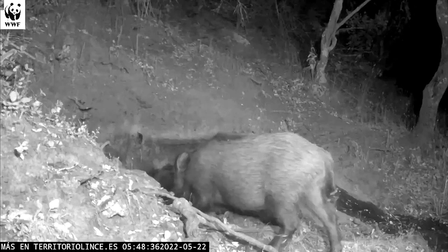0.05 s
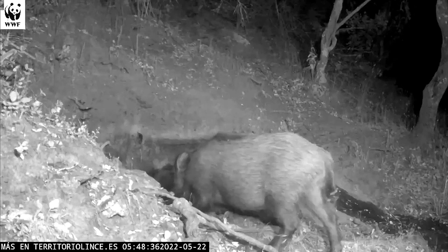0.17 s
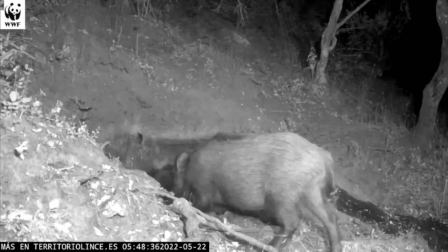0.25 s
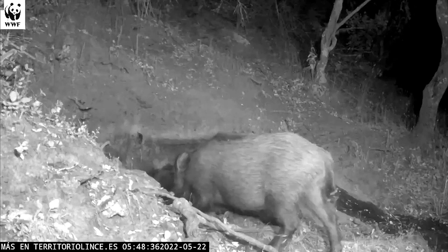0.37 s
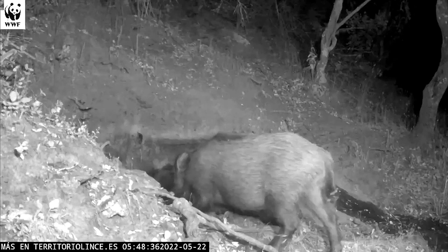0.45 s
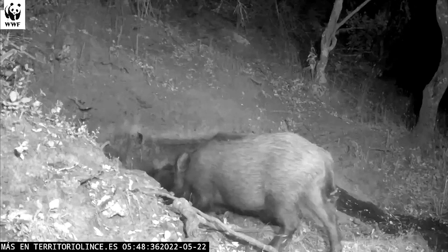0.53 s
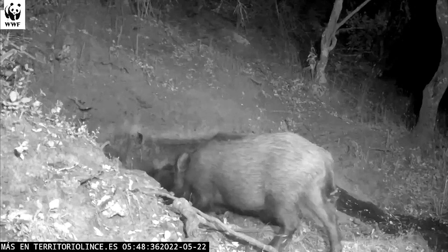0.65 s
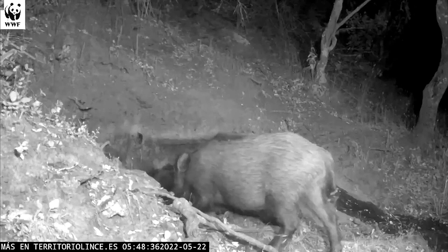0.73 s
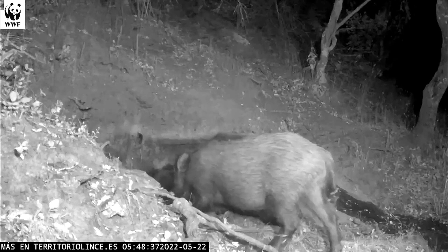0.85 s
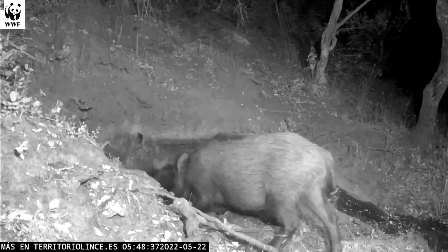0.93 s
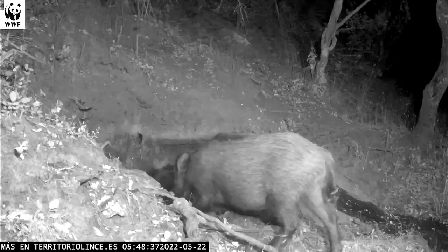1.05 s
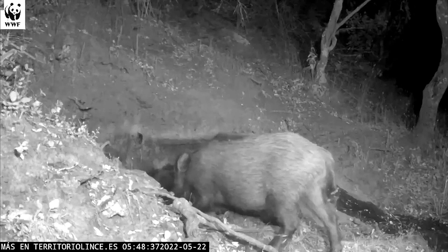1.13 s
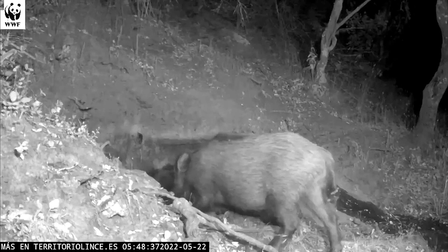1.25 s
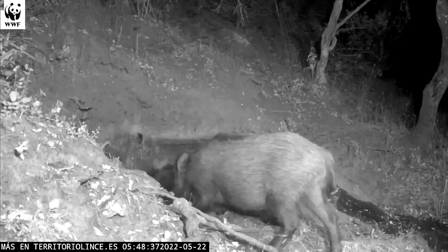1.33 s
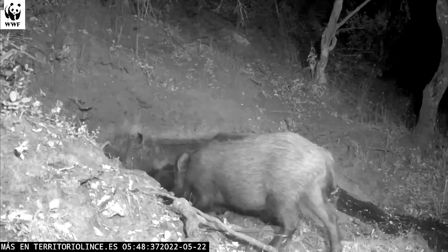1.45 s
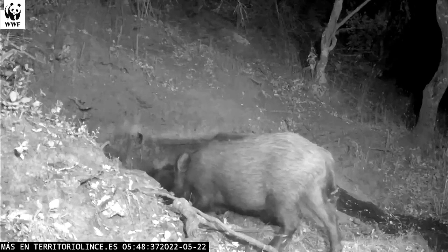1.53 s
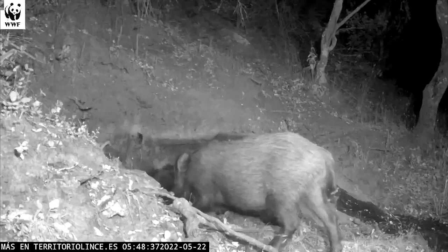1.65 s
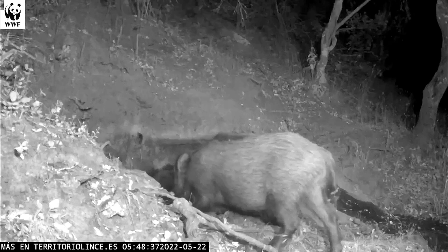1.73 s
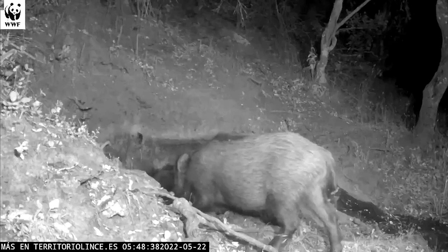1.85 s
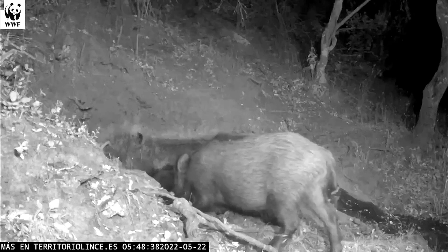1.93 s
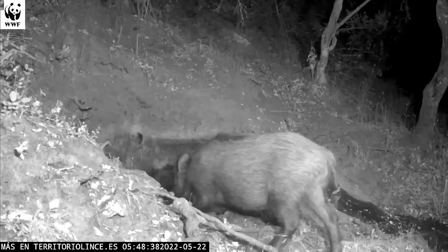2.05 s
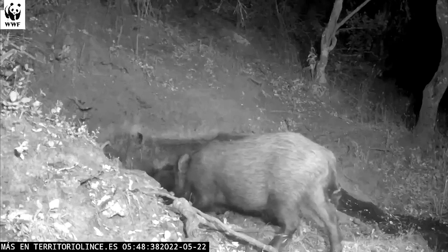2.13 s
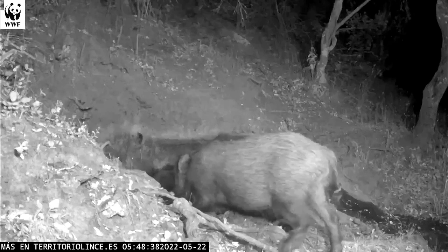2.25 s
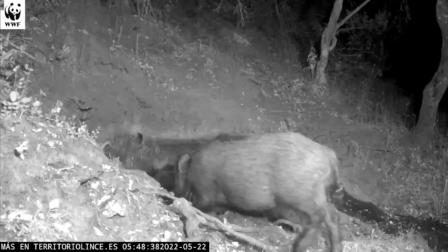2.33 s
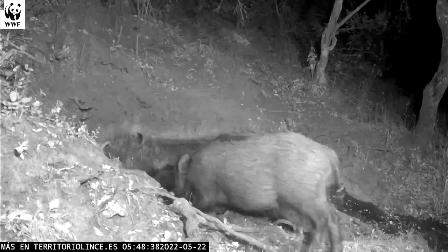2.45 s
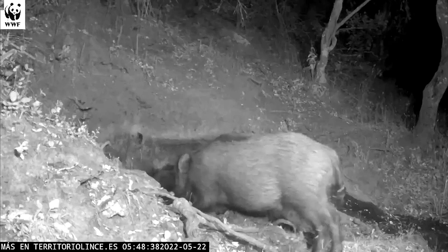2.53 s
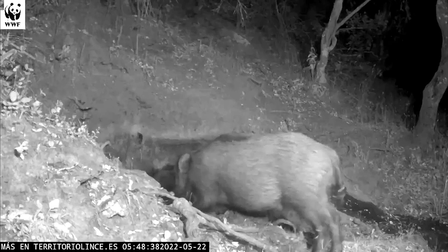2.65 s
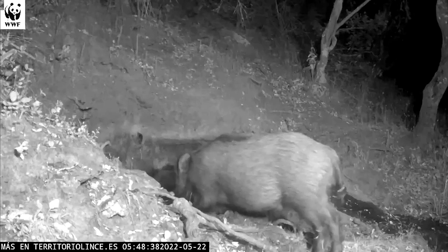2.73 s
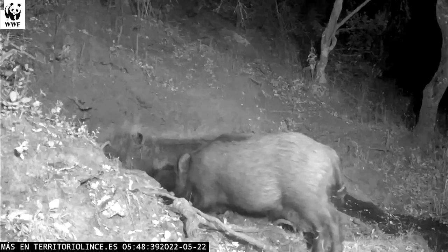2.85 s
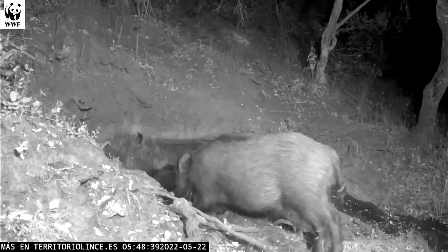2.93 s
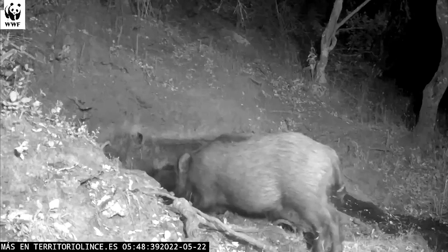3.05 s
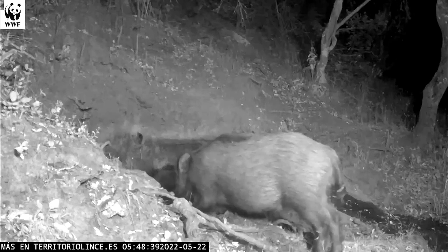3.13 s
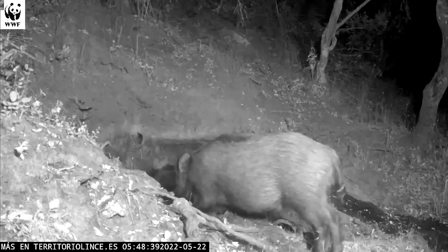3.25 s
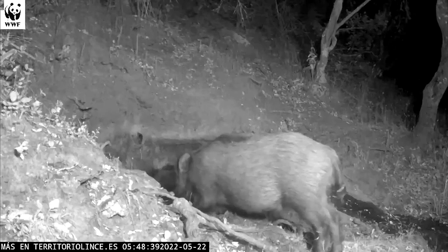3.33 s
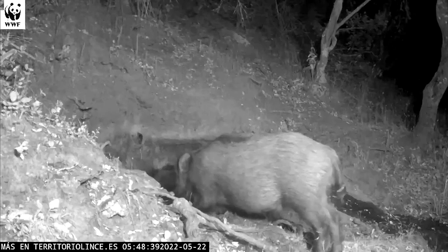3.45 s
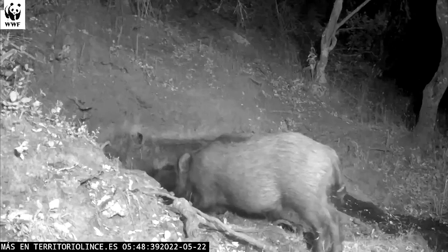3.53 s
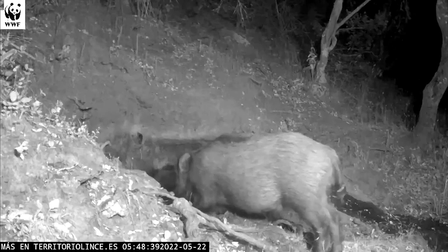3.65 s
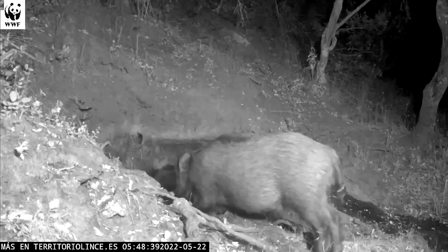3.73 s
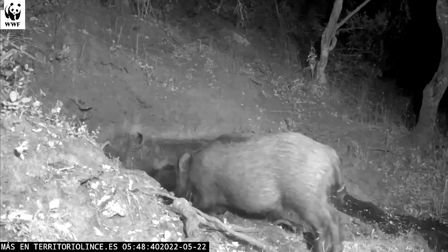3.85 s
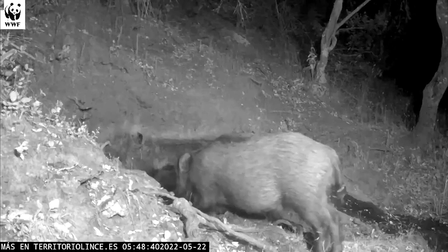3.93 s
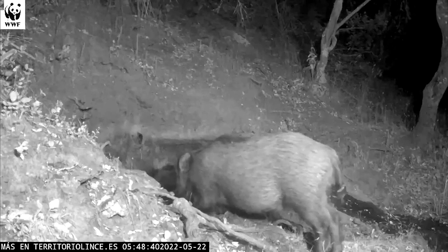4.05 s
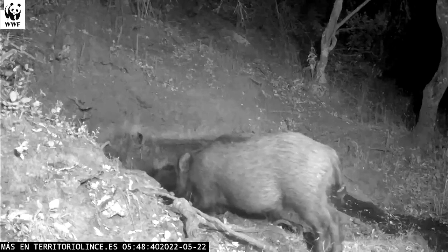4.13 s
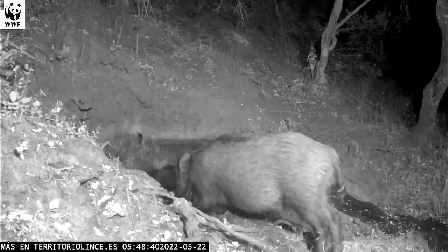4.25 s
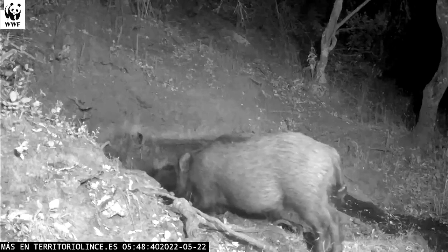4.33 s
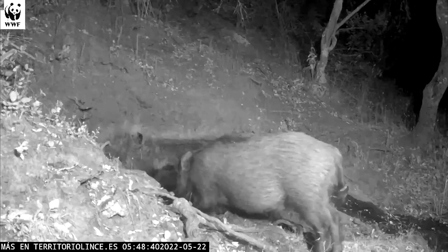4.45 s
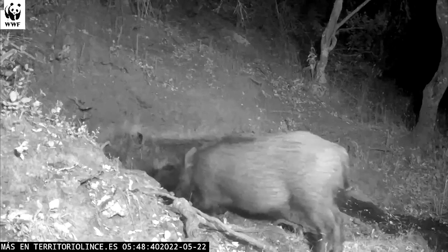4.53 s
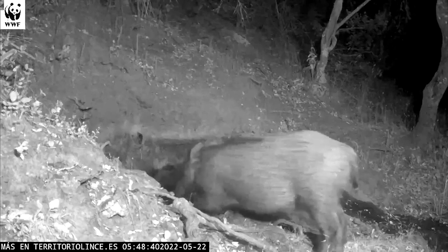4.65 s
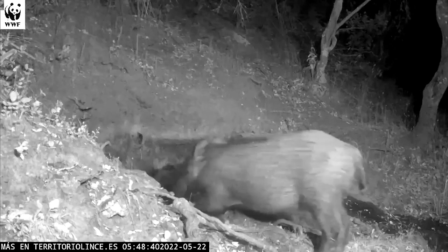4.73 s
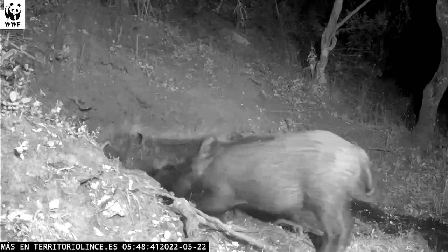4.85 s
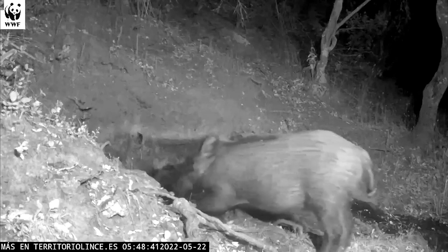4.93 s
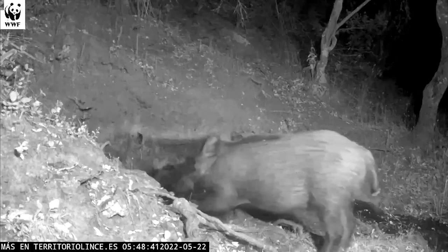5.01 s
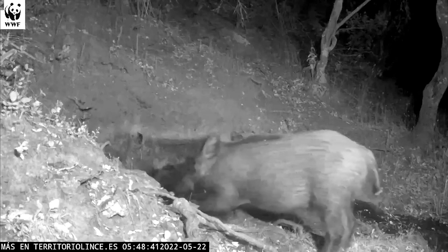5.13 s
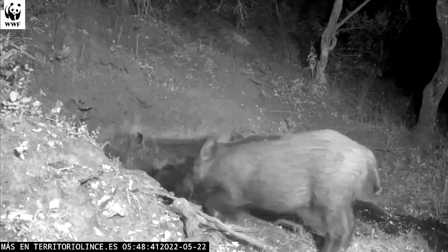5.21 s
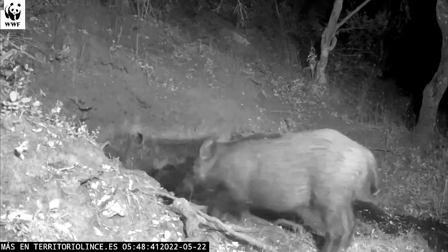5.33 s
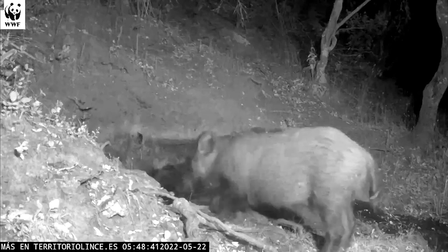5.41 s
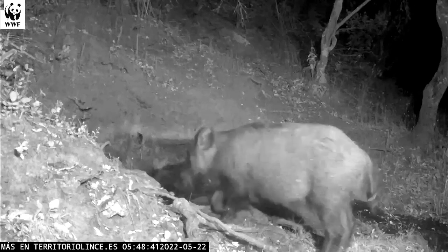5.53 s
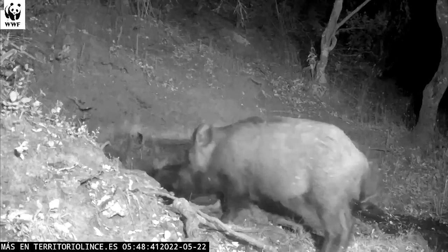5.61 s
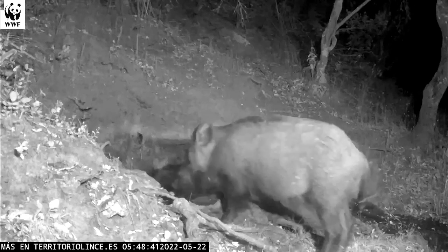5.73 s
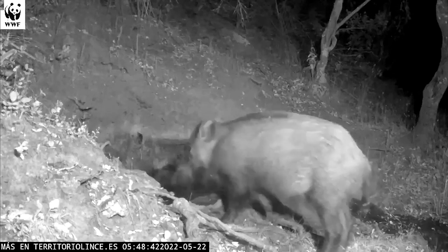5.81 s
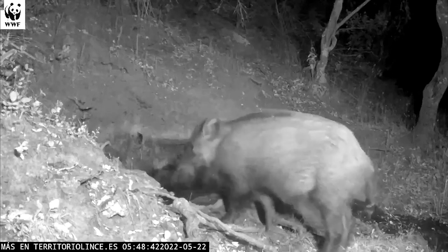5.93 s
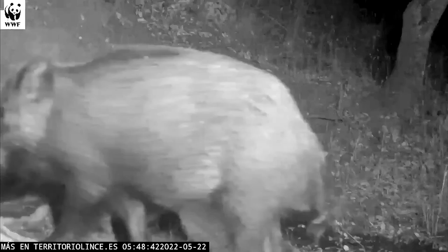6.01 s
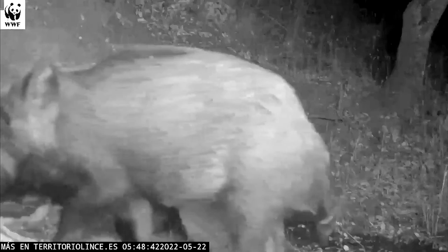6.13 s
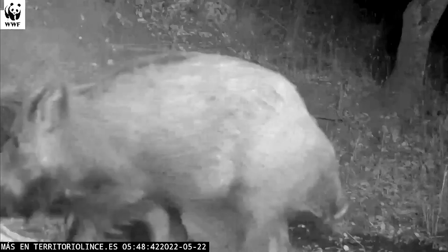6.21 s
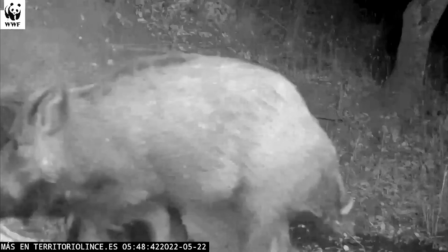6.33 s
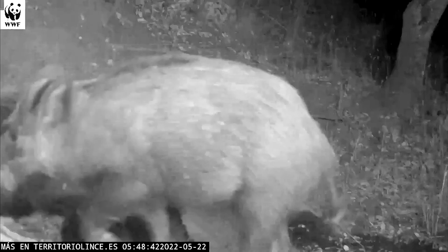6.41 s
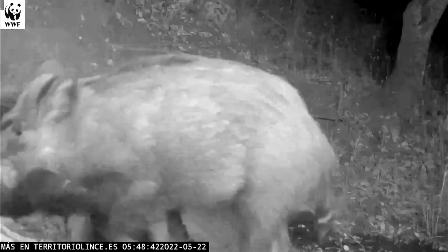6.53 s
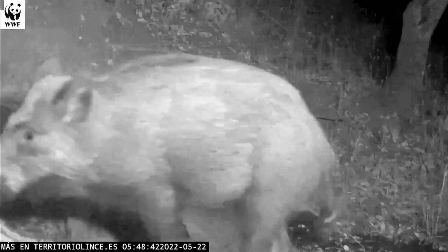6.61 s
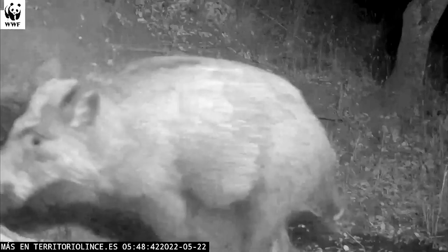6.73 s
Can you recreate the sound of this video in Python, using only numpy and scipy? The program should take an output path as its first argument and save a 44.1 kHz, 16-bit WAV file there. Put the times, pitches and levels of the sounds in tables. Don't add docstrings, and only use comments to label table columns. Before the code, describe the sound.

A boar at a muddy pool edge, heard through a cheap encased microphone with constant hiss, weak bass and rough, dulled treble. A brief snap and knock opens, followed by faint irregular lapping and occasional brittle ticks. A near-still stretch gives way to scattered footfalls, rustling leaves and snapping twigs, strongest near the end, with a very short faint echo from the bank.

```python
import sys
import numpy as np
from scipy import signal
from scipy.fft import rfft, irfft, next_fast_len
from scipy.io import wavfile
from scipy.ndimage import uniform_filter1d

SR = 44100
rng = np.random.default_rng(int(sys.argv[2]) if len(sys.argv) > 2 else 0)


def field_ratio(decibels):
    return 10 ** (np.asarray(decibels, dtype=float) / 20)


def output_pcm(signal):
    pcm = np.clip(np.atleast_2d(signal).T, -1, 1) * 32767
    wavfile.write(sys.argv[1], SR, np.round(pcm).astype(np.int16))


N = 298557


def rms_one(x):
    return x / np.sqrt(np.mean(x ** 2) + 1e-20)


def levels(rows):
    time_s, *columns = np.transpose(rows)
    span = np.arange(round(time_s[0] * SR), round(time_s[-1] * SR))
    return [span] + [np.interp(span / SR, time_s, column) for column in columns]


def coloured(x, spectrum):
    hz, db = np.transpose(spectrum)
    size = next_fast_len(N)
    log_hz = np.log(np.arange(size // 2 + 1) * SR / size + 1)
    gain = field_ratio(np.interp(log_hz, np.log(hz), db))
    return rms_one(irfft(rfft(x, size) * gain, size)[:N])


def drift(rate_hz):
    r = np.exp(-80 * np.pi * rate_hz / SR)
    slow = signal.lfilter([1], [1, -2 * r, r * r], rng.standard_normal(N // 40 + 2002))[2000:]
    return np.interp(np.arange(N) / 40, np.arange(len(slow)), rms_one(slow))


def resonance(x, hz, width_hz):
    r = np.exp(-np.pi * width_hz / SR)
    return signal.lfilter([1, 0, -1], [1, -2 * r * np.cos(2 * np.pi * hz / SR), r * r], x)


def grains(per_s, spread_db):
    sizes = field_ratio(spread_db * np.minimum(rng.exponential(1, N), 4))
    sizes = sizes * rng.choice([-1, 1], N)
    return sizes * (rng.random(N) < per_s / SR) + 1e-18


def add(out, start_s, sound, peak_db):
    i = max(round(start_s * SR), 0)
    out[i:i + len(sound)] += (field_ratio(peak_db) * sound / np.abs(sound).max())[:N - i]


def bursts(events, rise_s):
    out, t = np.zeros(N), np.arange(3000) / SR
    for start_s, peak_db, hz, t60_s, width_share, crack_share in events:
        noise = rng.standard_normal(len(t))
        burst = noise * (1 - np.exp(-t / rise_s)) * field_ratio(-60 * t / t60_s)
        ring = resonance(burst, hz, width_share * hz)
        ring = rms_one(resonance(ring, hz, 2 * width_share * hz))
        crack = rms_one(resonance(burst * field_ratio(-40 * t / t60_s), hz, 1.6 * hz))
        add(out, start_s - rise_s, ring + crack_share * crack, peak_db + 0.5)
    return out


# time_s, mouth_ring_db, wet_sizzle_db
LAPS = [
    [(0.75, -63, -59), (0.862, -58.5, -57), (0.926, -59, -53), (0.974, -50, -40.5), (0.982, -53, -59),
     (0.998, -64.5, -51.5), (1.06, -45, -45.5), (1.158, -67, -52), (1.278, -55, -60.5), (1.3, -78, -50)],
    [(1.4, -55, -49), (1.46, -48, -52.5), (1.488, -73, -53), (1.53, -45, -43.5), (1.568, -75, -53),
     (1.62, -59, -52)],
    [(1.8, -54, -48), (1.822, -59, -63), (1.854, -47, -41), (2.066, -56, -56), (2.098, -61, -60),
     (2.176, -54, -43), (2.184, -50, -68), (2.222, -66, -47), (2.3, -54, -52)],
    [(2.5, -63, -46), (2.554, -54, -64), (2.574, -48.5, -43.5), (2.604, -67, -64), (2.65, -59, -63)],
    [(2.9, -60, -53), (3.004, -48.5, -49), (3.122, -58, -51), (3.14, -68, -72), (3.162, -73, -45),
     (3.192, -70, -64), (3.2, -55, -50)],
    [(3.4, -69, -62), (3.422, -68, -51), (3.43, -70, -63), (3.46, -52.5, -53), (3.548, -56, -41.5),
     (3.562, -68, -67), (3.65, -58, -48)],
]


def lapping():
    mouth_hz, spray_hz = np.geomspace(994, 1300, 4), np.geomspace(4450, 5910, 4)
    mouth = rms_one(sum(resonance(grains(250, 2.8), hz, 110) for hz in mouth_hz))
    spray = rms_one(sum(resonance(grains(600, 3.0), hz, 500) for hz in spray_hz))
    out = np.zeros(N)
    for lap in LAPS:
        span, ring_db, sizzle_db = levels(lap)
        out[span] = field_ratio(ring_db + 2.4) * mouth[span] + field_ratio(sizzle_db + 0.5) * spray[span]
    return out


# start_s, peak_db, pitch_hz, t60_s (fade by 60 dB),
# width_share (of pitch), crack_share (loudness of wide crack beside the ring)
TWIGS = [(0.0306, -22.5, 5600, 0.02, 0.2, 0.41), (0.0358, -25, 6000, 0.013, 0.42, 0.26),
         (0.0428, -13.5, 5770, 0.0073, 0.15, 0.18), (0.0482, -21.5, 5520, 0.021, 0.21, 0.24),
         (0.9692, -32, 4870, 0.016, 0.17, 0.3), (1.038, -24, 4640, 0.014, 0.17, 0.16),
         (1.4513, -26, 4660, 0.014, 0.3, 0.23), (1.4693, -26, 4740, 0.016, 0.33, 0.24),
         (1.512, -27.5, 4700, 0.021, 0.21, 0.22), (2.0043, -26, 4700, 0.016, 0.27, 0.3),
         (2.0576, -26, 4670, 0.021, 0.16, 0.26), (3.029, -26.5, 4660, 0.0156, 0.17, 0.22),
         (3.1576, -28.5, 4420, 0.02, 0.24, 0.3), (3.2807, -33, 4460, 0.018, 0.12, 0.3),
         (4.6636, -12.5, 9700, 0.023, 0.36, 0.3), (5.2135, -11.5, 5500, 0.016, 0.5, 0.34),
         (5.404, -22, 4800, 0.025, 0.3, 0.33), (5.8927, -19.5, 5240, 0.0069, 0.3, 0.1),
         (5.904, -17, 6900, 0.012, 0.19, 0.75), (5.9585, -14.5, 5170, 0.014, 0.44, 0.9),
         (5.9936, -18.5, 5900, 0.013, 0.23, 0.3), (6.0404, -19, 5830, 0.015, 0.3, 0.3),
         (6.0479, -16.5, 5350, 0.0082, 0.37, 0.43), (6.054, -8, 4960, 0.03, 0.3, 0.12),
         (6.0744, -9.5, 4530, 0.01, 0.44, 0.38), (6.5808, -19, 5300, 0.0097, 0.55, 0.11),
         (6.5877, -20, 5790, 0.042, 0.24, 0.35), (6.6922, -26, 4400, 0.019, 0.3, 0.3),
         (6.7481, -18.5, 7800, 0.0074, 0.88, 0.16)]


def twig_snaps():
    return bursts(TWIGS, rise_s=0.0008)


# start_s, peak_db, pitch_hz, t60_s, width_share (of pitch), crack_share
DRY_TICKS = [(1.1214, -33, 6050, 0.012, 0.3, 0.81), (2.4024, -14, 5900, 0.0105, 0.71, 2.1),
             (2.4886, -18.5, 5900, 0.011, 0.31, 1.5), (4.6379, -24, 5700, 0.0091, 0.72, 1.3),
             (4.8524, -17, 5100, 0.0094, 0.67, 1.6), (5.2134, -13.5, 5320, 0.012, 0.8, 1.8),
             (5.2283, -16, 5300, 0.0097, 0.51, 1.9), (5.403, -20, 5040, 0.0093, 0.67, 1.7),
             (5.69, -22, 5250, 0.011, 0.57, 1.8), (5.866, -23.5, 5930, 0.014, 1, 1.2),
             (5.902, -16, 7300, 0.016, 0.97, 1.5), (6.402, -28, 5910, 0.012, 0.62, 1.4),
             (6.4159, -17, 5460, 0.016, 0.41, 1.5), (6.4241, -24.5, 5370, 0.0085, 0.8, 1.5),
             (6.449, -22, 7200, 0.012, 0.47, 1.2)]


def dry_ticks():
    return bursts(DRY_TICKS, rise_s=0.00019)


# start_s, peak_db, pitch_hz, t60_s, width_share (of pitch), crack_share
HOOF_KNOCKS = [(0.0403, -14, 1970, 0.022, 0.41, 0.52), (0.2304, -27.5, 2960, 0.016, 0.32, 0.78),
               (0.2583, -23, 3070, 0.0079, 0.15, 1), (2.0088, -34.5, 3040, 0.014, 0.35, 0.64),
               (5.1712, -19.5, 2300, 0.02, 0.55, 0.96), (5.1855, -17.5, 1730, 0.034, 0.2, 1),
               (5.229, -16, 2860, 0.025, 0.35, 0.9), (5.8945, -19.5, 3050, 0.018, 0.47, 0.72),
               (5.9937, -15.5, 2590, 0.03, 0.58, 0.81), (6.0312, -15, 3110, 0.012, 0.26, 1),
               (6.0492, -11, 3200, 0.011, 0.32, 0.9), (6.055, -8.5, 3200, 0.025, 0.64, 0.9),
               (6.0733, -9, 3200, 0.02, 0.48, 0.75), (6.498, -19.5, 2310, 0.036, 0.6, 0.41),
               (6.506, -16, 3040, 0.018, 0.35, 0.55), (6.5798, -19.5, 2400, 0.026, 0.26, 0.68),
               (6.6922, -16.5, 2480, 0.015, 0.22, 0.97)]


def hoof_knocks():
    return bursts(HOOF_KNOCKS, rise_s=0.0006)


# start_s, peak_db, pitch_hz, t60_s, width_share (of pitch), crack_share
LOW_KNOCKS = [(0.0278, -26, 1083, 0.06, 0.34, 0.81), (0.2798, -28, 1380, 0.031, 0.16, 0.42),
              (0.8689, -38, 1140, 0.035, 0.2, 0.5), (1.0575, -36, 1100, 0.032, 0.25, 0.32),
              (1.5129, -36.5, 1120, 0.03, 0.2, 0.49), (1.8597, -37.5, 1170, 0.035, 0.13, 0.6),
              (2.5128, -41.5, 1030, 0.041, 0.29, 0.69), (2.5612, -32.5, 1020, 0.034, 0.35, 0.55),
              (5.1773, -26, 1430, 0.043, 0.56, 1), (5.1982, -29, 1610, 0.064, 0.26, 0.35),
              (5.2047, -20.5, 1520, 0.02, 0.18, 0.65), (5.2275, -22.5, 1470, 0.035, 0.16, 0.45),
              (5.2374, -34, 1330, 0.035, 0.16, 0.28), (5.2474, -41, 1400, 0.035, 0.2, 0.58),
              (5.4745, -41, 1640, 0.039, 0.2, 0.4), (5.9931, -20.5, 1590, 0.02, 0.35, 0.44),
              (6.0474, -22.5, 1300, 0.028, 0.29, 0.46), (6.0545, -22.5, 1560, 0.078, 0.2, 0.46),
              (6.1944, -38, 1450, 0.039, 0.14, 0.25), (6.406, -35.5, 1123, 0.048, 0.094, 0.32),
              (6.4866, -30.5, 1210, 0.035, 0.14, 0.59), (6.5383, -32, 1056, 0.032, 0.3, 0.45),
              (6.581, -24.5, 1420, 0.029, 0.19, 0.46), (6.5982, -23.5, 1360, 0.06, 0.36, 1),
              (6.6104, -30, 1000, 0.02, 0.24, 0.48)]


def low_knocks():
    return bursts(LOW_KNOCKS, rise_s=0.0015)


# start_s, peak_db, pitch_hz, t60_s, width_share (of pitch), crack_share
WET_SQUEAKS = [
    (0.0445, -15, 5960, 0.03, 0.1, 0.05),
    (0.0534, -30, 6040, 0.03, 0.11, 0.05),
    (0.063, -30, 5860, 0.033, 0.1, 0.05),
]


def wet_squeaks():
    return bursts(WET_SQUEAKS, rise_s=0.0015)


# start_s, peak_db, pitch_hz, t60_s
HOOF_THUDS = [(0.266, -34, 299, 0.07), (2.551, -35.5, 313, 0.082), (5.104, -38.5, 314, 0.082),
              (5.168, -30.5, 378, 0.049), (5.197, -35.5, 452, 0.051), (5.233, -45, 212, 0.051),
              (5.357, -31.5, 366, 0.033), (5.388, -39, 330, 0.057), (5.404, -37, 207, 0.047),
              (5.903, -26, 205, 0.057), (5.987, -40, 426, 0.07), (6.047, -30, 202, 0.11),
              (6.063, -31.5, 272, 0.082), (6.195, -38, 418, 0.092), (6.415, -38.5, 218, 0.048),
              (6.497, -18.5, 269, 0.041), (6.51, -23.5, 187, 0.11), (6.576, -27, 253, 0.031),
              (6.596, -16, 228, 0.028), (6.624, -38.5, 233, 0.063), (6.693, -32.5, 200.4, 0.038)]


def hoof_thuds():
    out, t = np.zeros(N), np.arange(6000) / SR
    for start_s, peak_db, hz, t60_s in HOOF_THUDS:
        phase = 2 * np.pi * hz * (t + 0.0013 * (1 - np.exp(-t / 0.0086)))
        overtone = 0.3 * np.sin(2.2 * phase) * field_ratio(-40 * t / t60_s)
        push = (1 - np.exp(-t / 0.0032)) ** 2
        thud = (np.sin(phase) + overtone) * push * field_ratio(-60 * t / t60_s)
        add(out, start_s + 0.0005, thud, peak_db - 3.8)
    return out


# time_s, crunch_db, dull_share_db
LEAF_STEPS = [
    [(0.22, -51, -4), (0.228, -47, 3.5), (0.278, -34.5, -8), (0.31, -53.5, 9.5)],
    [(2.41, -36, -9), (2.42, -33, -17), (2.45, -45, -1.5), (2.48, -48.5, -4)],
    [(2.53, -58, 4), (2.552, -52, 2.5), (2.574, -43, -13), (2.6, -56.5, -4)],
    [(4.68, -48, -2), (4.694, -52, -13), (4.72, -39, -8), (4.814, -55.5, -6), (4.84, -56, -2)],
    [(4.87, -43, -10), (4.91, -51, -2.5), (4.92, -43, -17), (4.986, -38.5, -14), (5.11, -46, -8),
     (5.126, -42.5, -11), (5.15, -36.5, -11.5)],
    [(5.165, -30, -2.5), (5.183, -32.5, -6), (5.197, -35.5, -1.5), (5.21, -27, -9)],
    [(5.22, -24.5, -9), (5.24, -37, 1.5), (5.262, -41, -18.5), (5.28, -57, 7)],
    [(5.3, -61, -7), (5.312, -52, -8), (5.39, -41, -5)],
    [(5.43, -40, -8), (5.458, -54, -8), (5.614, -43, -11), (5.618, -48, -15), (5.664, -48, -15),
     (5.67, -55, -7)],
    [(6.045, -22.5, -4.5), (6.055, -12.5, -12), (6.09, -24.5, -11)],
    [(6.09, -27, -14), (6.116, -25, -13), (6.126, -38.5, -4), (6.18, -35, -19)],
    [(6.18, -37, -13), (6.186, -43, 2), (6.196, -33, -1), (6.266, -53.5, -9), (6.358, -40.5, -23),
     (6.39, -59, -4)],
    [(6.495, -39.5, 5.5), (6.509, -32, 5), (6.523, -47, -3), (6.535, -44, 2)],
    [(6.62, -40, -5), (6.638, -39.5, -16), (6.692, -26.5, -16.5), (6.74, -51, -1.5)],
]
# pitch_hz, level_db (per Hz)
LEAF_COLOUR = [(1180, -48.5), (2000, -25.5), (2320, -7), (2940, -2.5), (3840, -4), (4430, -1), (6900, -4),
               (9500, -14), (12400, -46), (20900, -120)]
# pitch_hz, level_db (per Hz)
MULCH_COLOUR = [(71, -57.5), (120, -10), (203, -3), (322, -5.5), (414, 3), (759, -25.5), (855, -12),
                (1110, -0.5), (2800, -3), (3640, -38), (6160, -120)]


def leaves():
    crisp = coloured(grains(7000 * field_ratio(5 * drift(60)), 1.8), LEAF_COLOUR)
    crisp = crisp * field_ratio(1.5 * drift(110))
    dull = coloured(grains(2000 * field_ratio(5 * drift(40)), 4.0), MULCH_COLOUR)
    out = np.zeros(N)
    for step in LEAF_STEPS:
        span, crunch_db, dull_db = levels(step)
        out[span] = field_ratio(crunch_db - 2.5) * (crisp[span] + field_ratio(dull_db + 2.0) * dull[span])
    return out


# pitch_hz, level_db (per Hz)
HISS_COLOUR = [(35, -85), (60, -54), (102, -24), (169, -11), (214, -5.5), (363, -5.5), (449, -9),
               (521, -10.5), (555, -13.5), (943, -18.5), (1140, -9.5), (2500, -6), (3030, -0.5),
               (9500, -20), (12400, -32.5), (20900, -120)]


def hiss(flutter_db):
    return field_ratio(-40 + flutter_db * drift(5.4)) * coloured(rng.standard_normal(N), HISS_COLOUR)


def scene():
    breaks = twig_snaps() + dry_ticks() + hoof_knocks() + low_knocks() + wet_squeaks()
    boar = lapping() + breaks + hoof_thuds() + leaves()
    lag = round(0.013 * SR)
    boar[lag:] += field_ratio(-19.5) * boar[:-lag]
    return np.tile(boar + hiss(flutter_db=0.65), (2, 1))


FRAME, FIRST_FRAME = 941, 525
# pitch_hz, step_db (over local level)
ROUNDING = [(100, -12), (800, -6), (1500, 1.5), (2500, 5), (6000, 6.5), (9500, 8)]


def rounded_frames(x, hop, top_hz, width, group, extra_db, wobble_db):
    start = 2 * hop - FIRST_FRAME % hop
    padded = np.pad(x, (start, 3 * hop))
    frames = np.lib.stride_tricks.sliding_window_view(padded, 2 * hop)[::hop]
    n = np.arange(2 * hop) + 0.5
    k = np.arange(int(top_hz / SR * 2 * hop)) + 0.5
    window = np.sin(np.pi * n / (2 * hop))[:, None]
    basis = window * np.cos(np.pi / hop * np.outer(n + hop / 2, k)) * np.sqrt(2 / hop)
    lines = frames @ basis
    band = (k // width).astype(int)
    power = uniform_filter1d(lines ** 2, size=2 * width, axis=1)
    power = uniform_filter1d(power, size=group, axis=0)
    middle = np.minimum(band * width + width // 2, len(k) - 1)
    level = np.sqrt(power + 1e-16)[:, middle]
    hz, db = np.transpose(ROUNDING)
    step_db = np.interp(np.log(k * SR / 2 / hop), np.log(hz), db)
    wobble = rng.standard_normal((len(frames), band[-1] + 1))[:, band]
    step = level * field_ratio(step_db + extra_db + wobble_db * wobble)
    rounded = np.sign(lines) * np.floor(np.abs(lines) / step + 0.41) * step
    halves = rounded @ basis.T
    return (halves[1:, :hop] + halves[:-1, hop:]).ravel()[start - hop:][:N]


def camera_rounding(x):
    treble = signal.butter(2, 2500, "high", fs=SR, output="sos")
    bright = signal.sosfilt(treble, x) ** 2
    now = uniform_filter1d(bright, size=130)
    before = uniform_filter1d(bright, size=900, origin=449)
    frame = (np.arange(N) - FIRST_FRAME + FRAME // 2) // FRAME + 1
    sudden = np.bincount(frame[300:], now[300:] > 12 * before[:-300], frame[-1] + 1) > 0
    tick_samples = [round(start_s * SR) for start_s, peak_db, *_ in DRY_TICKS if peak_db > -28]
    sudden[frame[tick_samples]] = True
    short = uniform_filter1d(sudden[frame] * 1.0, size=400)
    steady = rounded_frames(x * (1 - short), FRAME, top_hz=9680, width=20, group=1,
                            extra_db=0.53, wobble_db=1.5)
    quick = rounded_frames(x * short, FRAME // 8, top_hz=10100, width=4, group=5,
                           extra_db=-4.0, wobble_db=4.0)
    return steady + quick


def top_cut(x):
    return signal.sosfilt(signal.butter(12, 10780, fs=SR, output="sos"), x)


def record(dry):
    soft = 0.54 * np.tanh(dry[0] / 0.55)
    bass_cut = signal.butter(N=5, Wn=135, btype="high", fs=SR, output="sos")
    mono = camera_rounding(signal.sosfilt(bass_cut, soft))
    return top_cut(np.tile(mono, (2, 1)))


dry = scene()
out = record(dry)
output_pcm(out)
```